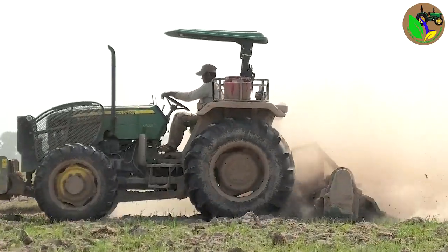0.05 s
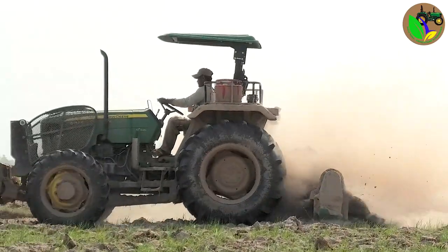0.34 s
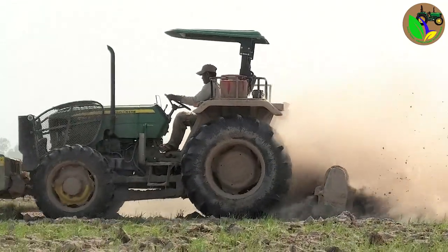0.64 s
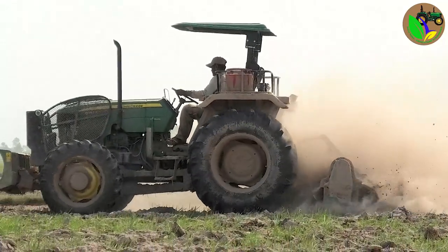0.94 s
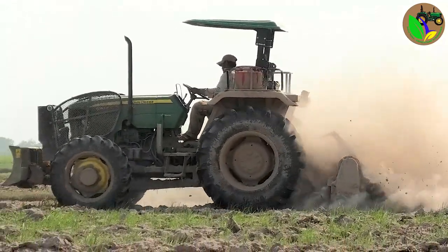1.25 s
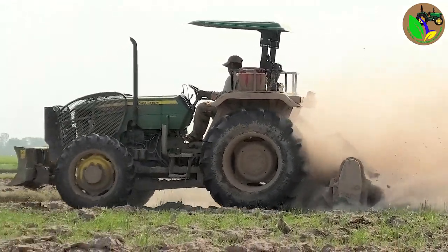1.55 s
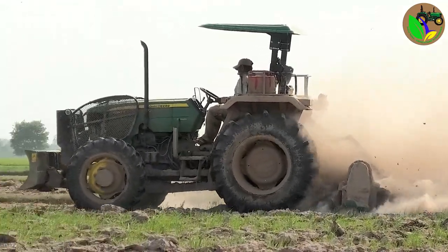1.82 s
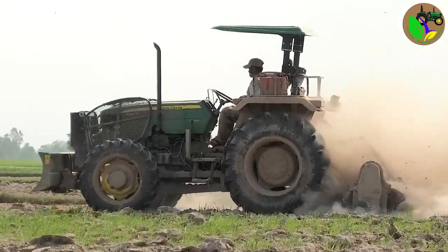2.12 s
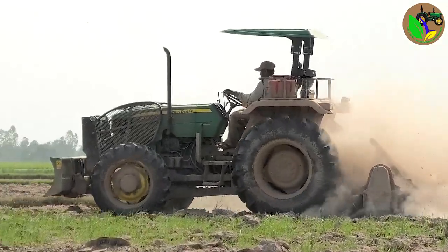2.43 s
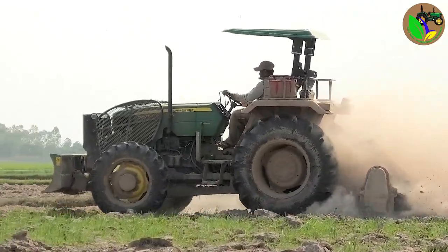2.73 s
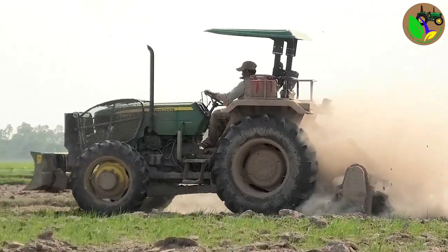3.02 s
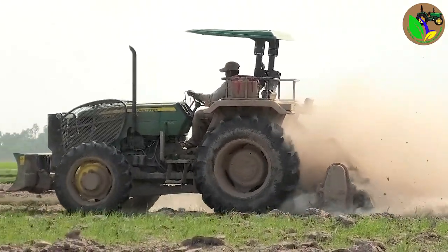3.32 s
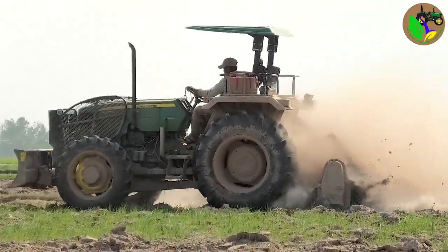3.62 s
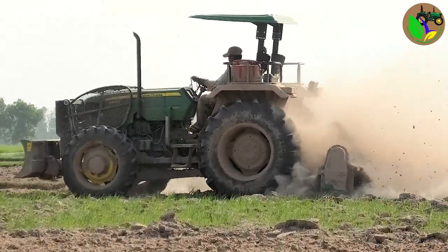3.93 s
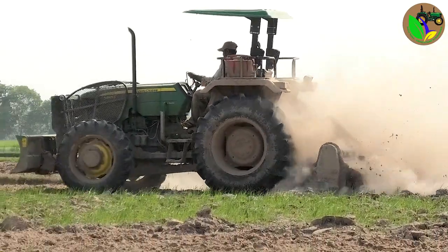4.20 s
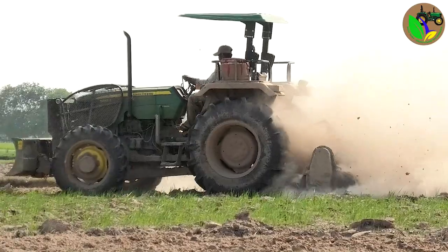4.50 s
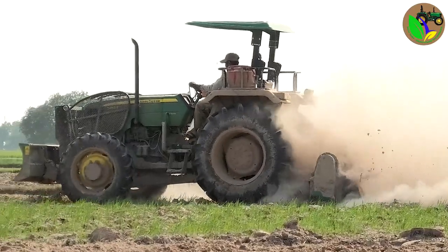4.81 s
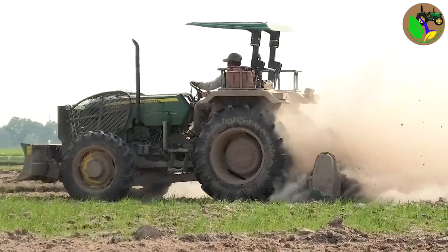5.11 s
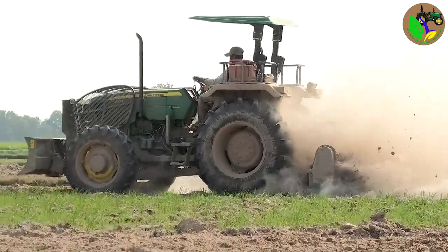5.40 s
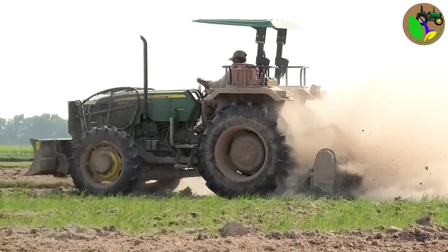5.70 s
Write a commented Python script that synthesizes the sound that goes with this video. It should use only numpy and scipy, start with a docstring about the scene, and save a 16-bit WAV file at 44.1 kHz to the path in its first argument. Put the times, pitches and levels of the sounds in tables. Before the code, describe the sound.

A diesel tractor is heard working from the first moment and keeps going for about six seconds, some metres away in an open field. A low exhaust hum and a drone lie under rapid metallic knocking, with occasional sharper pings. The engine speed wavers only slightly under load. Behind it, the gears whirr and crumbs of dry soil patter on the tiller's hood. The clatter dulls around 0.7 seconds, brightens near 1 second and again from 2 to 2.5, and a faint low whine comes forward between 3 and 4.3. The sound turns muffled around 4.4 seconds, dips briefly near 4.7, 5 and 5.4, then the clatter grows louder at the end. Wind rumbles on the microphone in uneven gusts, easing around 3 seconds, with the heaviest low thumps at about 0.6, 2.1, 4.6 and 5.6 seconds.

```python
"""A three-cylinder diesel tractor pulls a rotary tiller through dry soil, some metres off in a windy field.
Each firing drives the exhaust hum and knocks on the engine block, whose resonances ring.
Behind the engine the chassis drones, gears whirr and crumbs of soil patter on the tiller hood.
The treble comes and goes, the level dips briefly now and then, and wind buffets the microphone."""
import sys
import numpy as np
from scipy import signal
from scipy.fft import rfft, irfft
from scipy.io import wavfile
from scipy.ndimage import uniform_filter1d

SR = 44100
rng = np.random.default_rng(int(sys.argv[2]) if len(sys.argv) > 2 else 0)


def output_pcm(signal):
    """Save a mono or channel-first signal as 16-bit PCM at the path in sys.argv[1].

    Samples are clipped to [-1, 1] before scaling.
    """
    pcm = np.clip(np.atleast_2d(signal).T, -1, 1) * 32767
    wavfile.write(sys.argv[1], SR, np.round(pcm).astype(np.int16))


N = 262395
TIME = np.arange(N) / SR
FREQ = np.arange(N // 2 + 1) * SR / N


def undb(db):
    """Decibels to gain."""
    return 10 ** (np.asarray(db) / 20)


def unit(x):
    """Scale to rms 1."""
    return x / np.sqrt(np.mean(x ** 2))


def curves(table):
    """Automation: each column of a table joined by straight lines in time."""
    times, *columns = np.transpose(table)
    return [np.interp(TIME, times, column) for column in columns]


def swell(centre_s, half_s):
    """A bell-shaped rise and fall around a moment."""
    return np.exp(-((TIME - centre_s) / half_s) ** 2)


def sag(dips):
    """Decibels lost over time to bell-shaped dips."""
    return sum(depth_db * swell(s, half_s) for s, half_s, depth_db in dips)


def noise():
    """White noise."""
    return rng.standard_normal(N)


def walk(rate_hz):
    """Smooth random modulation with rms 1."""
    return unit(irfft(rfft(noise()) * np.exp(-(FREQ / rate_hz) ** 2), N))


def grains(per_s, spread_db):
    """Random clicks, a few of them much larger than the rest."""
    clicks = (rng.random(N) < per_s / SR) * noise()
    return unit(clicks * undb(spread_db * np.minimum(rng.exponential(size=N), 4)))


def tone(cycles, order, waver_db, wobble_rad):
    """A partial locked to the engine cycle, wavering in level and phase."""
    level = np.sqrt(2) * undb(waver_db * walk(6.8))
    return level * np.cos(2 * np.pi * (np.round(order) * cycles + rng.random()) + wobble_rad * walk(20))


def colour(x, points):
    """EQ through a curve that rolls off above its last point; rms 1."""
    hz, db = np.transpose(points)
    gain = undb(np.interp(np.log(FREQ + .1), np.log(hz), db)) / (1 + (FREQ / hz[-1] / 2) ** 4)
    return unit(irfft(rfft(x) * gain, N))


def ring(x, modes):
    """Pass a sound through steep resonances; rms 1."""
    power = sum(undb(db) ** 2 / (1 + ((FREQ - hz) / width) ** 2) ** 4 for hz, width, db in modes)
    # minimum phase: the modes ring only after they are struck
    cepstrum = irfft(np.log(power + 1e-7) / 2, N)
    cepstrum[1:N // 2] *= 2
    cepstrum[N // 2:] = 0
    return unit(irfft(rfft(x) * np.exp(rfft(cepstrum)), N))


def treble(x, edge_hz):
    """The part of a sound above an edge."""
    return irfft(rfft(x) * (1 - 1 / (1 + (FREQ / edge_hz) ** 16)), N)


def shelf(x, gain_db, edge_hz=3700):
    """High shelf: raise or lower the treble."""
    return x + (undb(gain_db) - 1) * treble(x, edge_hz)


def strike(starts, sizes, rise_s, decay_s):
    """Hit envelope: a steep attack at each start, then a dying force."""
    kicks = np.zeros(N)
    kicks[np.clip(starts * SR, 0, N - 1).astype(int)] = sizes
    age = TIME[:SR // 20]
    envelope = (1 - np.exp(-(age / rise_s) ** 2)) * np.exp(-age / decay_s)
    return signal.fftconvolve(kicks, envelope)[:N]


def eddies(spectrum, hold_s):
    """Turbulent pressure of even strength, ready to be swelled by the gusts."""
    pressure = colour(noise(), spectrum)
    power = uniform_filter1d(abs(signal.hilbert(pressure)) ** 2, int(hold_s * SR))
    return unit(pressure / np.sqrt(power))


# lulls in the breeze: centre_s, half_length_s, depth_db
LULLS = [(.99, 0.085, 3), (1.52, 0.042, 11.5), (2.9, 0.71, 7.5), (4.03, 0.075, 12), (4.97, 0.053, 1)]
# gusts on the microphone: centre_s, half_length_s, relative_rumble_db, relative_flutter_db
GUSTS = [(0.06, 0.027, -17, -28), (0.177, 0.033, -11, -26), (0.457, 0.066, -18.5, -43),
         (0.55, 0.031, -22, -33), (0.668, 0.02, -19, -32), (0.814, 0.033, -14.5, -31),
         (0.912, 0.029, -21, -38), (1.112, 0.048, -15, -32), (1.274, 0.068, -23.5, -50),
         (1.685, 0.016, -13.5, -37), (1.89, 0.024, -28, -32), (2.062, 0.04, -11, -47),
         (2.356, 0.029, -18.5, -44), (2.556, 0.045, -12.5, -44), (3.383, 0.02, -11, -38),
         (3.5, 0.034, -19.5, -31), (3.867, 0.041, -13, -43), (4.213, 0.029, -17, -42),
         (4.39, 0.02, -21, -34), (4.576, 0.049, -13.5, -26.5), (4.79, 0.11, -23, -47),
         (5.35, 0.055, -14.5, -30), (5.6, 0.018, -24, -35)]
# EQ curves of the wind's slow sway, rumble and flutter: frequency_hz, relative_db
SWAY_EQ = [(3, -30), (7, 11.5), (14, 9), (20, -26), (30, -27)]
RUMBLE_EQ = [(12, -5.5), (21, 6.5), (30, 7.5), (39, -9), (50, -9.5), (62, -13.5), (100, -37), (300, -77)]
FLUTTER_EQ = [(35, -22), (58, -29), (80, 7.5), (110, -6.5), (170, -10.5), (300, -37.5), (800, -32),
              (2000, -89)]

def gusts(breeze_rumble_db=-20, breeze_flutter_db=-35.5):
    """Eddies sway, rumble and flutter on the microphone; each gust adds its power to the breeze."""
    breeze = undb(-sag(LULLS))
    rumble_power = (breeze * undb(breeze_rumble_db)) ** 2
    flutter_power = (breeze * undb(breeze_flutter_db)) ** 2
    for s, half_s, rumble_db, flutter_db in GUSTS:
        rumble_power += undb(rumble_db) ** 2 * swell(s, half_s)
        flutter_power += undb(flutter_db) ** 2 * swell(s, half_s)
    # the slowest eddies outlast the single gusts
    sway_db = uniform_filter1d(10 * np.log10(rumble_power), SR // 3) + 9.5
    sway = undb(sway_db) * eddies(SWAY_EQ, hold_s=.37)
    rumble = undb(4.5) * np.sqrt(rumble_power) * eddies(RUMBLE_EQ, hold_s=.1)
    flutter = undb(.5) * np.sqrt(flutter_power) * eddies(FLUTTER_EQ, hold_s=.03)
    return sway + rumble + flutter


# sharp puffs of wind: centre_s, half_length_s, level_db
PUFFS = [(.120, .008, -32), (0.541, .015, -30), (1.396, .006, -32), (2.347, .01, -32), (3.098, .012, -32),
         (3.395, .008, -31), (4.573, .01, -28)]
# EQ curve of a puff: frequency_hz, relative_db
PUFF_EQ = [(30, -10), (65, -4.5), (130, 7), (400, -6), (800, -24), (1600, -41)]

def puffs():
    """Short bursts of turbulence land as dull thumps."""
    envelope = sum(undb(db) * swell(s, half_s) for s, half_s, db in PUFFS)
    return envelope * eddies(PUFF_EQ, hold_s=.014)


# heavy buffets: centre_s, pitch_hz, level_db
THUDS = [(.505, 35.8, -9.5), (.585, 32.15, -5), (.68, 34.15, -8), (2.11, 32, -9), (3.485, 39.8, -11),
         (3.87, 33.9, -14.5), (4.57, 42, -3.5), (5.607, 41.8, -7.5)]

def thuds(half_cycles=.96):
    """Heavy eddies strike the microphone, each with a few deep swings of pressure."""
    return sum(undb(db) * swell(s, half_cycles / hz) * np.cos(2 * np.pi * (hz * TIME + rng.random()))
               for s, hz, db in THUDS)


def wind(ceiling=.75):
    """Wind on the microphone: gusts and thuds soft-clip, and the puffs sit on top."""
    bed, thumps = gusts(), puffs()
    return ceiling * np.tanh((bed + thuds()) / ceiling) + thumps


# partials of the chassis drone: engine_order, relative_db
CHASSIS_PARTIALS = [(12, -7), (13, -12), (14, -15), (15, -14), (17, -15), (18, -14.5), (19, -15),
                    (22, -21.5), (23, -20), (24, -24.5)]
# EQ curves of the chassis' looping shake and its noise bed: frequency_hz, relative_db
SHAKE_EQ = [(200, -21), (400, 7.5), (600, 2.5), (800, 3), (1500, -7), (2200, -12)]
DRONE_EQ = [(90, -52), (150, 8.5), (220, 5.5), (330, -6), (450, -8), (700, -9.5), (1500, -85)]

def chassis_drone(cycles, level_db):
    """The chassis drones on the engine's higher orders and shakes in a pattern that repeats each cycle."""
    partials = sum(undb(db) * tone(cycles, order, waver_db=1, wobble_rad=.3)
                   for order, db in CHASSIS_PARTIALS)
    pattern = irfft(np.exp(2j * np.pi * rng.random(129)))
    loop = np.interp(cycles % 1, np.linspace(0, 1, len(pattern)), pattern)
    shake = undb(-15) * colour(loop, SHAKE_EQ)
    bed = undb(-.54) * colour(noise(), DRONE_EQ)
    return undb(level_db) * (partials + shake + bed)


# fader of the low gear whine: time_s, level_db
LOW_WHINE_FADER = [(0, -55), (1.7, -66), (2.7, -59), (3.24, -48), (3.8, -53.5), (4.22, -47), (4.55, -63),
                   (4.82, -51), (5.3, -64), (5.9, -66)]

def low_whine(cycles):
    """A low gear whine that comes forward midway."""
    return undb(curves(LOW_WHINE_FADER)[0]) * tone(cycles, order=36, waver_db=1.5, wobble_rad=1.9)


# resonances of gearbox, fan and tiller hood: pitch_hz, width_hz, relative_db
HOUSING_MODES = [(463, 210, 0.5), (727, 29, 3), (873, 215, -0.4), (1300, 350, 0), (1895, 160, 2),
                 (2390, 2530, -8), (3490, 1140, -7), (5470, 350, -8), (7870, 2730, -18)]
# gear whine, in clusters of neighbouring partials: engine_order, relative_db
GEAR_PARTIALS = [(72, -19), (75, -17.5), (93, -23), (94, -21.5), (95, -16), (96, -20.5)]

def whirr(cycles, level_db, crisp_db):
    """Gears whine and the fan churns while crumbs of dry soil patter on the tiller hood."""
    churn = noise() * undb(2.27 * walk(31))
    crumbs = grains(per_s=800, spread_db=1.9)
    housings = shelf(ring(churn + crumbs, HOUSING_MODES), -crisp_db, edge_hz=1960)
    whine = sum(undb(db) * tone(cycles, order, waver_db=2, wobble_rad=.5) for order, db in GEAR_PARTIALS)
    return undb(level_db) * (housings + whine)


# knock strength of each cylinder, in firing order: relative_db
CYLINDERS = [1.3, -0.7, -.1]
# hard knocks, each moved to the nearest ignition: time_s, accent_db, ping_pitch_hz
HARD_KNOCKS = [(.247, 2, 3700), (.296, 2.5, 5100), (.394, 5, 5100), (.428, 4, 3800), (.920, 2, 5200),
               (1.037, 2.5, 3750), (1.054, 2.5, 3700), (1.137, 3.5, 3700), (1.284, 2.5, 3800),
               (1.383, 3.5, 3750), (1.481, 2.5, 3700), (1.632, 3, 5100), (1.733, 2.5, 5200),
               (1.987, 2, 5100), (2.139, 7, 3800), (2.241, 6, 3800), (2.344, 1.5, 3600), (2.444, 3, 3900),
               (2.829, 2, 3750), (2.945, 2.5, 3700), (3.244, 3.5, 3700), (3.392, 2.5, 3700),
               (3.674, 6, 5100), (3.890, 4, 3700), (4.137, 2.5, 3750), (4.770, 2.5, 3700), (4.819, 2, 5100),
               (5.166, 6, 3700), (5.265, 2, 3700), (5.298, 2, 5100), (5.667, 2, 5100)]

def blows(firings, delay_firings=.115, rise_s=.0016, jitter_s=.0002, scatter_db=.6):
    """Force on the block, one blow per firing, and pings: a hard blow cracks and rings one resonance."""
    number = np.arange(int(firings[-1]) + 1)
    timing, strength = rng.standard_normal((len(number), 2)).T
    starts = np.interp(number + delay_firings, firings, TIME) + jitter_s * timing
    blow_db = np.resize(CYLINDERS, len(number)) + scatter_db * strength
    hard_s, accent_db, ping_hz = np.transpose(HARD_KNOCKS)
    hard = [np.argmin(abs(starts - s)) for s in hard_s]
    crack = strike(starts[hard] + rise_s / 2, undb(accent_db - 5), rise_s / 2, decay_s=.0011)
    latest = np.maximum(np.searchsorted(starts[hard], TIME) - 1, 0)
    rattle_rad = .91 * walk(400)  # keeps a ping from being a pure tone
    ringing = np.sqrt(2) * np.sin(2 * np.pi * ping_hz[latest] * TIME + rattle_rad)
    pings = strike(starts[hard], undb(accent_db + 4.5), rise_s, decay_s=.0029) * ringing
    blow_db[hard] = accent_db - 2.2  # crack and ping take part of the blow's force
    return strike(starts, undb(blow_db), rise_s, decay_s=.0054) + crack, pings


# resonances of engine block and covers: pitch_hz, width_hz, relative_db
BLOCK_MODES = [(765, 130, -1), (1300, 910, -1.5), (1780, 310, -1), (2450, 660, -2.5), (3197, 160, -1.5),
               (3728, 650, 3.5), (4348, 190, 2), (5014, 304, -2.5), (5457, 410, -4.5), (7720, 890, -12.5),
               (8540, 1800, -17), (9850, 900, -20.5), (11400, 2600, -31.5)]

def diesel_knock(firings, level_db, crisp_db, band_edges_hz=(3000, 3700, 5100), flicker_db=.67):
    """Every ignition shakes loose a burst of small metal impacts that ring the block."""
    ignition, pings = blows(firings)
    # a softer valve-train clack falls between each two ignitions
    valves = undb(-12 - crisp_db) * np.exp(-((firings % 1 - .6) / .11) ** 2)
    impacts = ignition * (noise() + .5 * grains(per_s=5000, spread_db=.95))
    clatter = ring(impacts + valves * noise(), BLOCK_MODES)
    # each band of the block's ring answers every blow a little differently
    above = [clatter] + [treble(clatter, hz) for hz in band_edges_hz] + [0]
    bands = [low - high for low, high in zip(above, above[1:])]
    clatter = unit(sum(band * undb(flicker_db * walk(63)) for band in bands))
    return undb(level_db) * shelf(clatter + pings, gain_db=.9 + 1.05 * walk(6.3))


# faders of the exhaust's hum and throat: time_s, hum_db, throat_db
EXHAUST_FADERS = [(0, -29, -37), (.3, -30.5, -39), (.45, -28.5, -42), (.55, -33.5, -37), (.78, -29, -40),
                  (.9, -36, -39.5), (1.02, -29.5, -37.5), (1.27, -31.5, -38), (1.45, -34.5, -45),
                  (1.62, -26, -36.5), (1.73, -30, -37), (1.95, -27, -37), (2.18, -32.5, -36.5),
                  (2.4, -29, -37.5), (2.72, -28.5, -42.5), (3.02, -25, -38), (3.56, -26, -36),
                  (3.8, -29.5, -36.5), (4.08, -25.5, -33.5), (4.36, -25, -35.5), (4.52, -27, -59),
                  (4.66, -32.5, -49), (4.8, -23, -40), (4.96, -35, -44), (5.08, -27.5, -39.5),
                  (5.26, -25.5, -41), (5.39, -32.5, -48), (5.54, -26.5, -36), (5.9, -25, -36.5)]
# weaker overtones from the unequal cylinders: engine_order, relative_db
EXHAUST_OVERTONES = [(7, -13.5), (8, -10), (10, -22.5), (11, -23)]
# fader of the hollow body hum: time_s, level_db
BODY_FADER = [(0, -46.5), (1.0, -52), (1.6, -50), (2.1, -52.5), (3.0, -59), (4.5, -53)]

def exhaust(firings, cycles, dip_db):
    """Gas pulses through the silencer, which leaves only their low partials."""
    hum_db, throat_db = curves(EXHAUST_FADERS)
    # the gas pulse arrives just after the knock, never quite evenly
    angle = 2 * np.pi * (firings - .34) + .092 * walk(2.4)
    waver_db = .47 * walk(16)
    rough_db = .84 * walk(30)  # the pulses differ from firing to firing
    # the pipe favours the octave of the firing rate
    hum = undb(hum_db + waver_db + rough_db) * (np.cos(2 * angle) + undb(-5) * np.cos(angle))
    throat = undb(throat_db - .76 + .57 * walk(8)) * np.cos(3 * angle)
    overtone_db = -36.5 + .32 * (hum_db - hum_db.mean()) - dip_db  # partly rides the hum's fader
    overtones = sum(undb(db) * tone(cycles, order, waver_db=-4, wobble_rad=.042)
                    for order, db in EXHAUST_OVERTONES)
    body = undb(curves(BODY_FADER)[0]) * tone(cycles, order=16, waver_db=2.4, wobble_rad=.15)
    return np.sqrt(2) * (hum + throat) + undb(overtone_db) * overtones + body


# engine speed, sagging and recovering with the tiller's load: time_s, firing_rate_hz
ENGINE_SPEED = [(0.0, 62.12), (0.28, 60.92), (0.62, 61.56), (0.91, 59.67), (1.25, 60.92), (2.04, 58.66),
                (2.55, 59.34), (2.75, 60.43), (3.09, 59.83), (3.17, 60.85), (3.74, 60.17), (4.08, 60.55),
                (4.39, 62.18), (5.22, 60.14), (5.3, 60.53), (5.64, 58.63), (5.95, 60.75)]
# slow faders of the tractor's parts: time_s, knock_and_whirr_db, drone_db
TRACTOR_FADERS = [(0, -41, -38), (.8, -41.5, -46), (1.71, -43, -43.5), (2.45, -42, -47), (2.75, -41, -44.5),
                  (3.0, -39, -40), (3.24, -38.5, -39), (3.47, -38.5, -39.5), (3.95, -41.5, -42),
                  (4.36, -37, -36), (5.1, -42, -42.5), (5.55, -40.5, -42.5), (5.76, -37, -44.5),
                  (5.92, -34.5, -42.5)]
# brief dips in the machinery's level: centre_s, half_length_s, depth_db
LEVEL_DIPS = [(.22, 0.045, 4), (1.46, 0.11, 3.5), (4.47, 0.039, 4), (4.66, 0.066, 6.5), (4.965, 0.045, 8),
              (5.39, 0.061, 7)]
# treble fades, shared by knock, whirr and shelf (negative brightens): centre_s, half_length_s, depth_db
TREBLE_FADES = [(.22, 0.12, 4), (.41, 0.058, -5.5), (.54, 0.23, 7), (.7, 0.27, 12), (1.02, 0.14, -6.5),
                (1.4, 0.14, -3.5), (1.65, 0.11, -1.5), (1.95, 0.082, -5.5), (2.33, 0.081, -8),
                (2.47, 0.069, -6), (3.15, 0.15, -4.5), (3.68, 0.13, -3.5), (4.42, 0.22, 13.5),
                (4.66, .04, -3.5), (4.78, 0.044, -2), (4.97, 0.13, 9), (5.17, 0.2, -5), (5.57, 0.26, 7)]
# how far the softer clatter sinks between the knocks: time_s, depth_db
CRISPNESS = [(0, -0.5), (1.2, 2), (2.2, 0), (2.8, -1), (3.3, -3), (3.7, 0.5), (4.4, -2), (5.17, 0),
             (5.5, 2.5), (5.92, 1.5)]

def scene():
    """The mix: tractor and tiller at a steady distance, with wind at the microphone."""
    firings = np.cumsum(curves(ENGINE_SPEED)[0]) / SR
    cycles = firings / len(CYLINDERS)  # an engine order is a multiple of this cycle's rate
    machine_db, drone_db = curves(TRACTOR_FADERS)
    dip_db, fade_db, crisp_db = sag(LEVEL_DIPS), sag(TREBLE_FADES), curves(CRISPNESS)[0]
    machinery = (diesel_knock(firings, machine_db + 1.5 - .43 * fade_db, crisp_db)
                 + whirr(cycles, machine_db - .25 - .13 * fade_db, crisp_db)
                 + low_whine(cycles))
    bright = undb(-dip_db) * shelf(machinery, -.34 * fade_db)
    low_end = exhaust(firings, cycles, dip_db) + chassis_drone(cycles, drone_db + .14 - dip_db)
    fade_in = np.minimum(TIME / .008, 1)
    return (fade_in * (bright + low_end + wind()))[None]


# narrow notches in the treble: centre_hz, width_hz, depth_db
NOTCHES = [(4360, 220, 49), (6190, 280, 14), (7910, 460, 11)]

def record(dry):
    """Master EQ: a few narrow notches in the treble, then a steep cut of the top."""
    heard, top_hz = dry, 15700
    for hz, width_hz, depth_db in NOTCHES:
        band = signal.filtfilt(*signal.iirpeak(hz, hz / width_hz, fs=SR), heard)
        heard = heard - (1 - undb(-depth_db)) * band
    return signal.sosfiltfilt(signal.ellip(8, .1, 50, top_hz, fs=SR, output="sos"), heard)


dry = scene()
out = record(dry)
output_pcm(out)
```